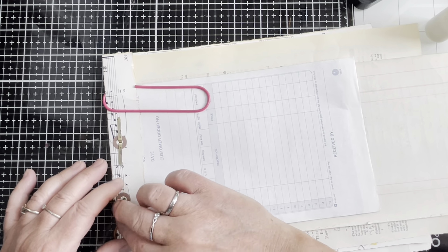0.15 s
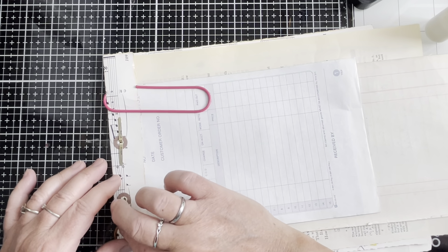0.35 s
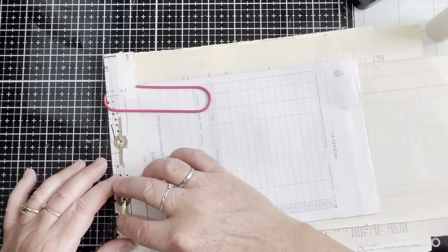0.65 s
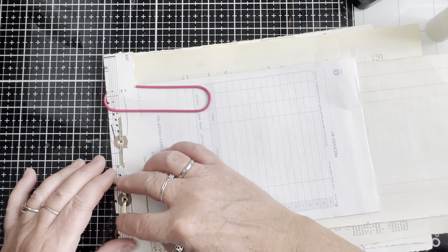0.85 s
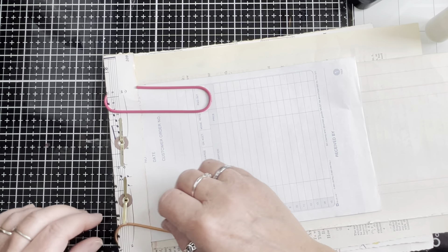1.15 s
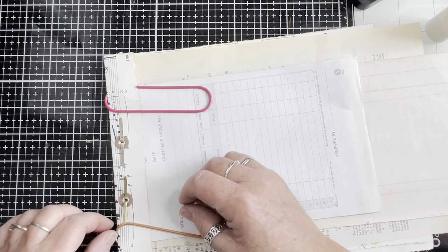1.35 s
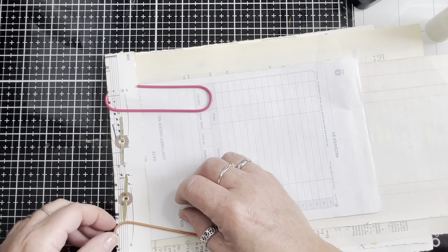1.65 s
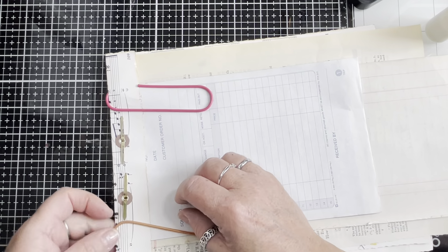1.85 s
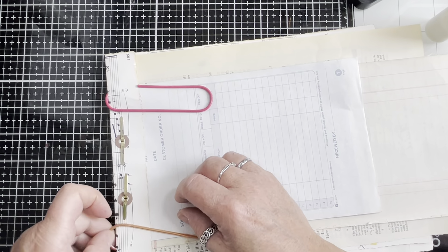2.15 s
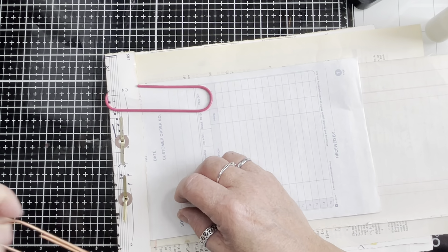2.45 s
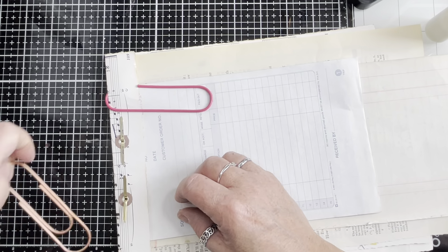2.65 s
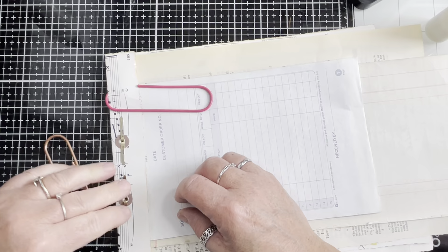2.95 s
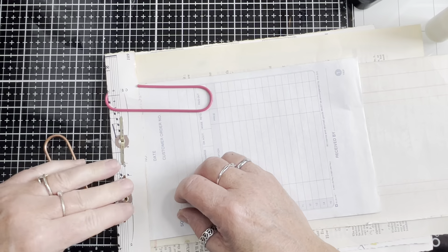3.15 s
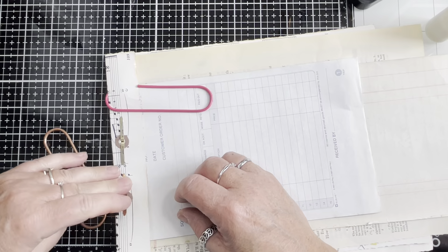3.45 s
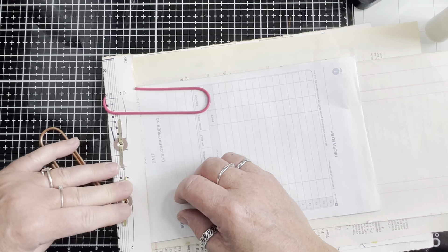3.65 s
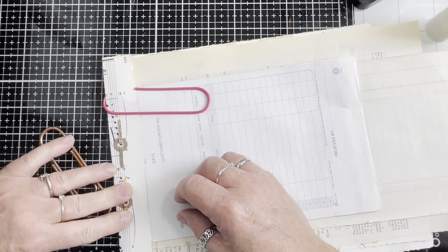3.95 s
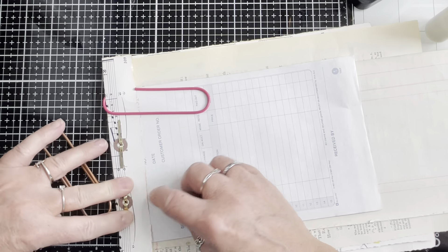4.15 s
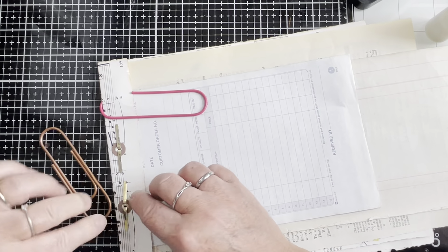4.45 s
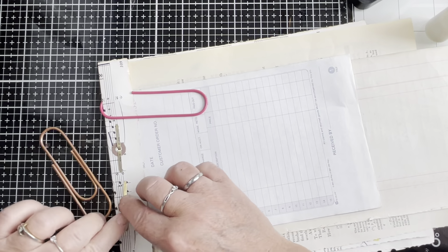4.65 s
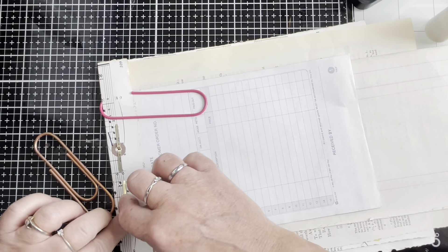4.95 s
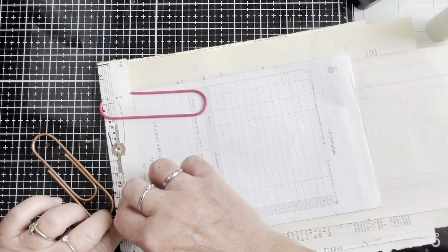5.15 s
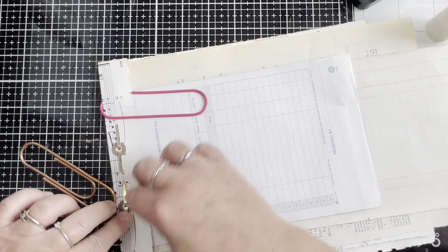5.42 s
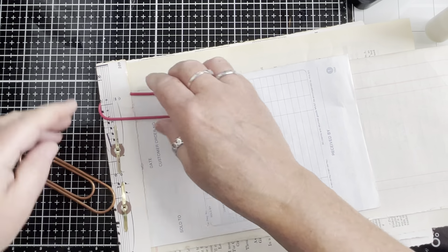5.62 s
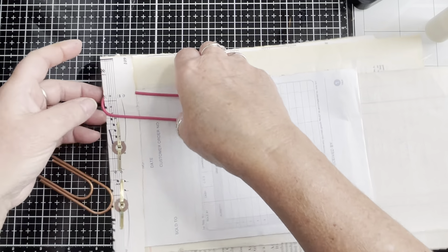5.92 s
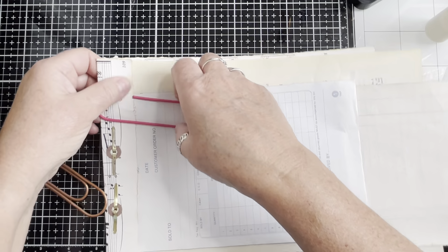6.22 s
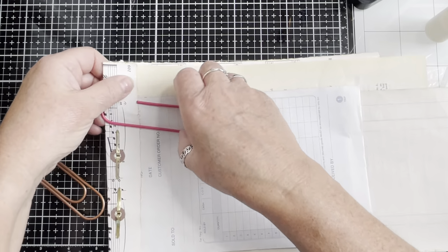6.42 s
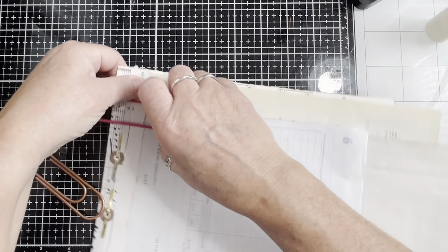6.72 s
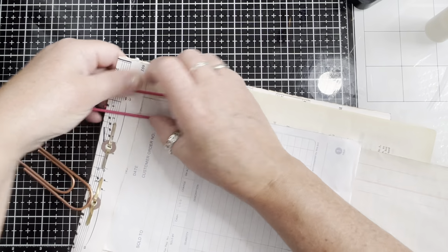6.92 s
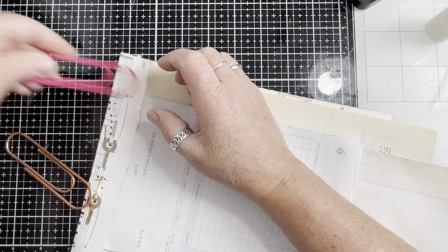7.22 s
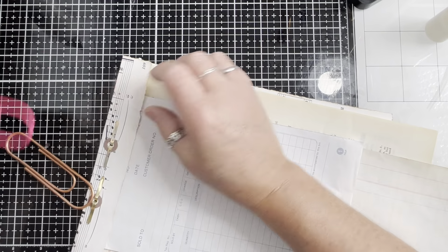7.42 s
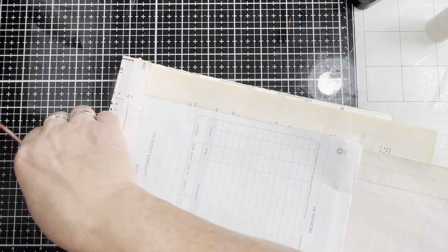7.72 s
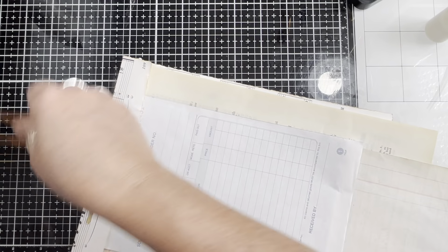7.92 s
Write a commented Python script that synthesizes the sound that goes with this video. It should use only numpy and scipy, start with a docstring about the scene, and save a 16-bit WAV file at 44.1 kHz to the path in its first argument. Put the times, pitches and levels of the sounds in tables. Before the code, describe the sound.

In a quiet room, fingers slide over paper while metal clips scrape free, rattle brightly on a desk and are snatched away.

```python
"""Wire clips pulled off paper

Hands pull two large wire clips off a stack of paper on a glass desk mat in a quiet room.
Wire, rings and nails tap the desk: short noise bursts through resonances of desk, paper and wire.
Skin and wire slide over the sheets as grainy noise; dragged metal and moving air pockets add tones.
A low hum and room air lie beneath. A small device with two microphone ports listens from above."""
import sys
import numpy as np
from scipy import signal
from scipy.fft import rfft, irfft, next_fast_len
from scipy.io import wavfile
from scipy.ndimage import uniform_filter1d

SR = 44100
rng = np.random.default_rng(int(sys.argv[2]) if len(sys.argv) > 2 else 0)


def generate_wav(sig):
    """Save sig (samples, or channels by samples) to the path in sys.argv[1] as 16-bit PCM at SR."""
    pcm = np.round(np.clip(np.atleast_2d(sig).T, -1, 1) * 32767).astype(np.int16)
    wavfile.write(sys.argv[1], SR, pcm)


N = 356328

# Resonances of desk and stack. Each row: pitch in Hz, width in Hz, relative level in dB.
DESK_MODES = [(237.6, 7.6, -11), (605, 39, -6.5), (1031.4, 59, -7), (1500, 160, -11), (1826, 34, 2.5),
              (1974, 21, -6), (2221, 45, -4)]
PAD = SR    # spare samples that let late bursts run past the end
BURST_SAMPLES = int(.16 * SR)


def from_db(db):
    """Gain of a dB value."""
    return 10 ** (np.asarray(db) / 20)


def rms_one(x):
    """Scaled to rms 1."""
    return x / np.sqrt(np.mean(x ** 2) + 1e-20)


def band(x, low_hz, high_hz, order=2):
    """Butterworth band-pass."""
    edges = [low_hz, min(high_hz, .45 * SR)]
    return signal.sosfilt(signal.butter(order, edges, "band", fs=SR, output="sos"), x)


def coloured(x, spectrum):
    """Steady noise given a spectrum of (Hz, dB per Hz) rows; rms 1."""
    hz = np.fft.rfftfreq(N, 1 / SR) + 1
    table = np.array(spectrum)
    gain_db = np.interp(np.log(hz), np.log(table[:, 0]), table[:, 1])
    return rms_one(irfft(rfft(x) * from_db(gain_db), N))


def drift(rate_hz):
    """Slow random wander of rms 1: low-passed noise made at a twentieth of the sample rate."""
    r = np.exp(-40 * np.pi * rate_hz / SR)
    white = rng.standard_normal(N // 20 + 3002)
    slow = signal.lfilter([1], [1, -2 * r, r * r], white)[3000:]    # skip the filter's start
    return np.interp(np.arange(N) / 20, np.arange(len(slow)), rms_one(slow))


def resonance(x, hz, width_hz):
    """Two-pole resonance that turns white noise of rms 1 into rms 1."""
    r = np.exp(-np.pi * width_hz / SR)
    feed = np.sqrt((1 - r * r) / 2) * np.array([1, 0, -1])
    return signal.lfilter(feed, [1, -2 * r * np.cos(2 * np.pi * hz / SR), r * r], x)


def chatter(t60, rise_s, crack=0):
    """Envelope of a contact's short rough burst: quick rise, a sharp first crack, exponential fall."""
    t = np.arange(BURST_SAMPLES) / SR
    crack_t60 = 0.015
    body_fall = from_db(-60 * t / max(t60, .005))
    crack_fall = from_db(-60 * t / crack_t60)
    return (1 - np.exp(-t / rise_s)) * ((1 - crack) * body_fall + crack * crack_fall)


def burst_span(s):
    """Samples that a burst starting at s seconds covers."""
    return slice(int(s * SR), int(s * SR) + BURST_SAMPLES)


def hard_contacts(clack_hz, deep):
    """Each hard contact drives desk modes, short modes of wire and paper, and a thud, each by its own force."""
    # Hard contacts of wire, rings and nails. Each row: start in seconds, level in dB,
    # treble over body in dB, nominal 60 dB decay in seconds.
    contacts = [(0.298, -48.5, -41, 0.0027), (0.487, -59.5, -11, 0.062), (0.928, -64.5, -37, 0.027),
                (0.97, -57.5, 4.5, 0.028), (1.621, -42.5, -13, 0.0067), (1.725, -61.5, -8, 0.012),
                (1.81, -39, -10, 0.0081), (1.825, -29.5, 18, 0.029), (1.831, -16, 6.5, 0.029),
                (1.952, -41, -7.5, 0.022), (2.093, -45.5, -7, 0.045), (2.467, -19, 12.5, 0.037),
                (2.652, -16.5, 8, 0.063), (2.686, -23.5, 10.5, 0.046), (2.707, -25.5, 3.5, 0.061),
                (2.759, -24.5, 3.5, 0.079), (2.771, -11.5, 9.5, 0.069), (2.81, -30.5, 9, 0.064),
                (2.829, -27, 4.5, 0.018), (2.847, -18.5, 7, 0.089), (2.855, -18.5, 8, 0.053),
                (2.9, -35, -2, 0.026), (2.911, -18, 5, 0.063), (2.929, -31.5, 4, 0.025),
                (2.935, -26, 3.5, 0.09), (2.959, -25.5, 6, 0.05), (3.02, -43, -17, 0.03),
                (3.104, -46.5, -21.5, 0.045), (3.154, -47.5, -41.5, 0.035), (3.346, -56.5, -53.5, 0.011),
                (3.376, -40, 13, 0.042), (3.475, -20, 5.5, 0.06), (3.504, -33, 0.5, 0.079),
                (3.524, -36, 0, 0.058), (3.629, -49, 0, 0.029), (3.935, -47.5, 1.5, 0.092),
                (3.961, -42.5, -17, 0.03), (4.186, -49.5, 3, 0.17), (4.318, -47, -1, 0.013),
                (4.714, -46.5, -25.5, 0.09), (4.738, -25.5, 4, 0.052), (4.798, -29, 1, 0.056),
                (4.879, -31, -4, 0.032), (4.95, -38.5, -7, 0.098), (4.98, -35, 0, 0.094),
                (5, -45, 2, 0.039), (5.02, -41.5, -25, 0.015), (5.37, -37, -3.5, 0.066),
                (5.397, -32, 6, 0.069), (5.451, -50.5, 2, 0.2), (5.489, -19, 5, 0.089),
                (5.513, -28.5, 9, 0.12), (5.528, -21, 2, 0.041), (5.55, -35, -3.5, 0.096),
                (5.729, -55.5, 11, 0.014), (5.904, -36, -4, 0.031), (5.912, -24.5, -13, 0.0068),
                (5.923, -40.5, -3.5, 0.068), (5.979, -44.5, -16, 0.046), (6.042, -47, -6.5, 0.095),
                (6.104, -41, -1, 0.05), (6.356, -42, -9, 0.046), (6.371, -25, 3, 0.093),
                (6.402, -33, -9, 0.028), (6.416, -31, -0.5, 0.055), (6.454, -36.5, -6.5, 0.058),
                (6.584, -52, 2, 0.1), (6.75, -38, -1, 0.095), (6.783, -39, 1, 0.038), (6.798, -36, 3, 0.12),
                (7.156, -45.5, 68, 0.037), (7.204, -35.5, 20, 0.043), (7.254, -42.5, -3, 0.028),
                (7.273, -26, 17, 0.055), (7.29, -42, 3, 0.035), (7.3, -34.5, -1.5, 0.037),
                (7.514, -60.5, -17.5, 0.076), (7.703, -51, -15, 0.16), (7.726, -34, -15, 0.084),
                (7.76, -38, -4, 0.059), (7.779, -29, -8, 0.073)]
    thud_db = -26             # thud drive over the contact's level
    dry_t60 = 0.038           # shorter contacts land partly on the stack, wholly so below half of it
    paper_hz, paper_db, paper_damps_db = 2770, 9.5, -14     # the stack adds a broad peak, damps the desk
    count = len(clack_hz)
    highness = np.clip(np.log2(clack_hz / 2600) / 1.1, 0, 1)    # how far a mode follows the blow's hardness
    thin_db = 2.3 * np.minimum(np.log2(clack_hz / paper_hz), 0)    # thin wire radiates low modes weakly
    haste = 1 + 0.15 * highness[:, None]      # high modes die sooner
    modes = np.zeros((len(DESK_MODES), N + PAD))
    clacks = np.zeros((2, count, N + PAD))    # contacts off the stack, contacts on it
    thud = np.zeros(N + PAD)
    chance = rng.standard_normal((len(contacts), len(DESK_MODES) + count))
    for (s, level_db, treble_db, t60), own in zip(contacts, chance):
        at = burst_span(s)
        body = from_db(level_db) / np.sqrt(1 + from_db(2 * treble_db))    # body and treble split the level
        dry = np.clip(2 - 2 * t60 / dry_t60, 0, 1)

        push = body * from_db(paper_damps_db * dry)
        push = push + deep * from_db(level_db + thud_db + 10.0)    # the deep modes feel the thud too
        push = push * from_db(4 * own[count:])
        modes[:, at] += push[:, None] * chatter(.8 * t60, rise_s=.0012)

        peak_octaves = min(treble_db, 0) / 45    # softer blows sound lower
        paper = np.exp(-((np.log2(clack_hz / paper_hz) - peak_octaves) / 0.26) ** 2)
        clack_db = treble_db * highness + thin_db + paper_db * dry * paper + 2.5 * own[:count]
        burst = chatter(t60, rise_s=0.00075, crack=0.37)
        share = np.sqrt([[[1 - dry]], [[dry]]])
        clacks[..., at] += share * body * from_db(clack_db)[:, None] * burst ** haste

        thud[at] += from_db(level_db + thud_db) * chatter(2.95 * t60, rise_s=0.0071)
    return modes, clacks, thud


def soft_bumps(deep):
    """Fingers and wrists bump the desk softly: only thud and deep modes sound, then the desk top sways."""
    # Soft bumps. Each row: start in seconds, knock drive in dB, sway drive in dB.
    bumps = [(1.038, -50, -49.5), (1.31, -77, -48), (1.828, -44, -39.5), (2.094, -51, -55.5),
             (2.473, -41.5, -50), (3.638, -75, -48.5), (3.96, -50, -65.5), (4.184, -53.5, -43),
             (4.739, -60, -42), (5.727, -48.5, -50.5), (5.911, -39, -50), (6.754, -53, -47),
             (6.98, -48.5, -47.5), (7.158, -40.5, -64), (7.252, -39.5, -51), (7.712, -39.5, -40)]
    bump_t60 = 0.031
    modes, thud, sway = np.zeros((len(DESK_MODES), N + PAD)), np.zeros(N + PAD), np.zeros(N + PAD)
    for s, knock_db, sway_db in bumps:
        at = burst_span(s)
        modes[deep, at] += from_db(knock_db - 3.0) * chatter(bump_t60, rise_s=0.002)
        thud[at] += from_db(knock_db) * chatter(2.44 * bump_t60, rise_s=0.0004)
        sway[at] += from_db(sway_db) * chatter(0.28, rise_s=0.021)
    return modes, thud, sway


def taps(count=26):
    """Contact envelopes gate noise, which rings the modes of desk, wire and paper and makes the thuds."""
    # Clear modes of wire and rings: pitch in Hz.
    wire_hz = [2760, 3918, 4580, 5813, 6720, 11505]
    wire_width_hz, stack_width = 120, 0.22    # the second is width over pitch of modes the stack damps
    clack_hz = np.geomspace(1220, 15500, count)
    deep = np.array(DESK_MODES)[:, 0] < 700
    modes, clacks, thud = hard_contacts(clack_hz, deep)
    bump_modes, bump_thud, sway = soft_bumps(deep)
    modes += bump_modes
    thud += bump_thud

    noise = rng.standard_normal((3, N))
    noise[1] *= rms_one(from_db(0.79 * drift(280)))      # the wire rattles: many tiny touches in one burst
    rings = sum(from_db(db - 5.5) * resonance(drive[:N] * noise[0], hz, width)
                for drive, (hz, width, db) in zip(modes, DESK_MODES))
    clack = []
    for k, hz in enumerate(clack_hz):    # neighbours alternate in sign; 1e-18 keeps the filters fast
        free = resonance(clacks[0, k, :N] * noise[1] + 1e-18, hz, 0.066 * hz)
        damped = resonance(clacks[1, k, :N] * noise[k % 2] + 1e-18, hz, stack_width * hz)
        clack.append((-1) ** k * (free + damped))
    wire = 0
    for hz in wire_hz:
        nearest = np.argmin(abs(clack_hz - hz))
        wire = wire + resonance(clacks[0, nearest, :N] * noise[1] + 1e-18, hz, wire_width_hz)

    low = band(rings + from_db(-6.0) * sum(clack[:count // 2]), 350, 3200)      # low modes carry no treble
    high = from_db(-4.0) * band(sum(clack[count // 2:]), 4000, 9000, order=1)
    thuds = from_db(10.5) * band(thud[:N] * noise[2], 24, 820, order=1)
    swaying = from_db(17.0) * band(sway[:N] * noise[0], 37, 130)
    return low + from_db(-14) * wire + high + thuds + swaying


def dragging():
    """Uneven slips of hard metal on the mat set the desk modes going."""
    # A ring or wire end dragged over the mat. Each row: start in seconds, end in seconds, level in dB.
    drags = [(0.063, 0.164, -66.5), (0.201, 0.296, -56), (0.323, 0.381, -61.5), (5.842, 5.868, -45)]
    t, gate = np.arange(N) / SR, 0
    for start_s, end_s, db in drags:
        ramps = np.minimum((t - start_s) / 0.025, (end_s - t) / 0.028)
        gate = gate + from_db(db) * np.clip(ramps, 0, 1)
    slips = rng.standard_normal(N) * from_db(2.2 * drift(70))
    rings = sum(from_db(db) * resonance(slips, hz, 3.8 * width) for hz, width, db in DESK_MODES)
    return gate * rms_one(band(rings, 450, 3000))


def strokes():
    """Gains of scuff and hiss: each stroke swells to its strongest moment and fades."""
    # Skin or wire over paper. Each row: strongest moment in seconds, swell in seconds per 20 dB,
    # fade in seconds per 20 dB, scuff level in dB, hiss level in dB.
    stroke_list = [(0.17, 0.3, 0.25, -71.5, -67.5), (0.76, 0.043, 0.12, -86, -73.5),
                   (1.049, 0.17, 0.44, -79, -66.5), (1.332, 0.056, 0.052, -67.5, -67),
                   (1.721, 0.071, 0.048, -82, -63), (2.2, 0.16, 0.36, -75.5, -62.5),
                   (2.448, 0.3, 0.071, -72.5, -53), (3.08, 0.4, 0.049, -62, -87),
                   (3.601, 0.52, 0.13, -77, -71), (4.131, 0.32, 0.23, -73, -65.5),
                   (5.87, 0.19, 0.21, -60.5, -59.5), (6.162, 0.083, 0.09, -58.5, -55),
                   (6.251, 0.11, 0.25, -58.5, -58), (6.6, 0.1, 0.24, -56.5, -49.5),
                   (6.87, 0.12, 0.22, -57.5, -65), (7.003, 0.066, 0.033, -54, -50),
                   (7.24, 0.2, 0.025, -57.5, -46.5), (7.499, 0.23, 0.43, -80, -68)]
    t = np.arange(0, N, 64) / SR
    scuff, hiss = from_db(-87.5), from_db(-90.5)    # hands at rest on the sheets
    for s, swell_s, fade_s, scuff_db, hiss_db in stroke_list:
        shape = from_db(-20 * np.maximum((s - t) / swell_s, (t - s) / fade_s))
        scuff = scuff + from_db(scuff_db) * shape
        hiss = hiss + from_db(hiss_db) * shape
    return [np.interp(np.arange(N) / SR, t, gain) for gain in (scuff, hiss)]


def rubbing():
    """Fibres catch and slip: dense uneven grains excite desk modes, a scuff and a bright hiss, over a rumble."""
    # Colour of the hiss. Each row: frequency in Hz, relative level in dB per Hz.
    hiss_colour = [(2500, -15), (4000, -0.5), (6000, 3), (10000, -2.5), (16000, -4.5)]
    scuff, hiss = strokes()
    unevenness_db = 2.0 * np.minimum(rng.exponential(1, (3, N)), 5)
    grains = rng.standard_normal((3, N)) * from_db(unevenness_db)
    snaps = 1. * (rng.random(N) < 35 / SR)    # stray creases snap, about 35 a second
    grains[:2] *= 1 + 2.5 * (uniform_filter1d(snaps, size=110) > 0)
    catching = from_db(1.6 * drift(25))     # the hand's pressure flutters
    in_desk = sum(from_db(db) * resonance(grains[0], hz, width) for hz, width, db in DESK_MODES)
    scrape = from_db(2.0) * rms_one(band(grains[1], 620, 3200))
    sheets = from_db(-2.0) * resonance(rms_one(grains[2]), 2330, 450)      # the sheets colour the scuff
    body = rms_one(rms_one(in_desk) + scrape + sheets)
    rumble = from_db(-17.0) * rms_one(band(rng.standard_normal(N), 60, 220, order=1))
    return catching * (scuff * (body + rumble) + hiss * coloured(grains[2], hiss_colour))


def pocket():
    """Wire sliding between sheets or over the mat: rough banded noise follows a moving air-pocket resonance."""
    # Hollow tones, one group per slide. Each row: time in seconds, pitch in Hz, level in dB.
    slides = [
        [(1.87, 2150, -69.5), (2.33, 2637, -61), (2.46, 2660, -71)],
        [(3.065, 488, -56), (3.22, 405, -70)],
        [(6.5, 2170, -56), (6.74, 2453, -63.5)],
        [(6.98, 3650, -65), (7.26, 3670, -70)],
    ]
    # Half width over starting pitch, one value per slide.
    half_widths = [.14, .2, .15, .07]
    t, out = np.arange(N) / SR, 0
    for rows, width in zip(slides, half_widths):
        s, hz, level_db = np.transpose(rows)
        low_pass = signal.butter(2, width * hz[0], fs=SR, output="sos")
        wobble = signal.sosfilt(low_pass, rng.standard_normal((2, N)))
        turn = 2 * np.pi * np.cumsum(np.interp(t, s, hz)) / SR
        tone = rms_one(wobble[0] * np.cos(turn) + wobble[1] * np.sin(turn))
        edge = np.clip(np.minimum(t - s[0], s[-1] - t) / 0.02, 0, 1)
        out = out + edge * from_db(np.interp(t, s, level_db) + 1.8 * drift(27)) * tone
    return out


def ports(x):
    """A close source reaches the two ports with a phase lead that varies with pitch, largest in the treble."""
    # Phase lead of the left port over the right. Each row: frequency in Hz, lead in radians.
    port_lead = [(0, 0), (600, -.8), (1050, -.25), (2300, .6), (2760, -.3), (3790, .7), (4820, -.4),
                 (7500, 3.1), (13400, 9.1), (15400, 9.9)]
    size = next_fast_len(N + 4096)
    lead = np.interp(np.fft.rfftfreq(size, 1 / SR), *np.transpose(port_lead))
    turned = rfft(x, size) * np.exp(.5j * lead * [[1], [-1]])    # half the lead each way
    return irfft(turned, size)[:, :N]


def room(x):
    """Dense reflections off desk and walls: dull dying noise, another in each channel."""
    room_t60 = 0.15
    t = np.arange(int(.4 * SR)) / SR
    tail = rng.standard_normal((2, len(t))) * from_db(-60 * t / room_t60) * (t > .003)
    tail = band(tail, 240, 4100)
    return signal.fftconvolve(x[None], tail / np.sqrt(np.sum(tail[0] ** 2)), axes=1)[:, :N]


def room_air():
    """Diffuse air noise and a wavering low hum, probably from a machine elsewhere in the house."""
    # Colour of the room air. Each row: frequency in Hz, relative level in dB per Hz.
    air_colour = [(36, -38.5), (62, -7), (130, -21), (300, -28), (700, -41), (2000, -41.5), (8000, -60),
                  (16000, -61.5)]
    air_db, hum_hz, hum_db = -72, 43, -59
    mid, side = [coloured(white, air_colour) for white in rng.standard_normal((2, N))]
    side = from_db(4.5) * band(side, 430, 16000, order=1)     # long waves reach both ports alike
    turn = 2 * np.pi * np.cumsum(hum_hz + 0.44 * drift(0.78)) / SR
    hum = from_db(hum_db + 0.41 * drift(4.3)) * np.sin(turn)
    return from_db(air_db) * (mid + side * [[1], [-1]]) + hum


def scene():
    """Desk sounds through ports and room, over the air."""
    desk = taps() + dragging() + rubbing() + pocket()
    return ports(desk) + from_db(-15) * room(desk) + room_air()


def record(dry):
    """The top is cut: a steep low-pass is 60 dB down from 16.9 kHz."""
    return signal.sosfilt(signal.cheby2(12, 60, 16900, fs=SR, output="sos"), dry)


dry = scene()
out = record(dry)
generate_wav(out)
```